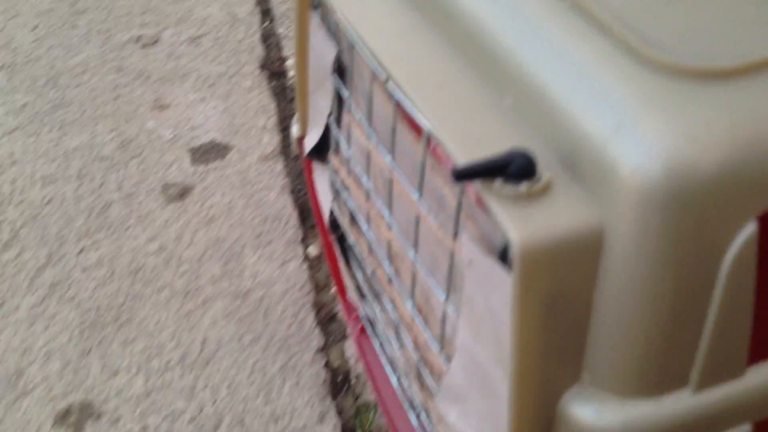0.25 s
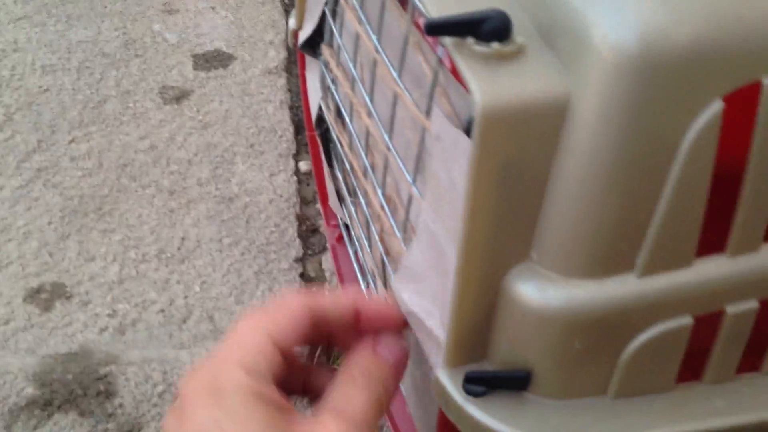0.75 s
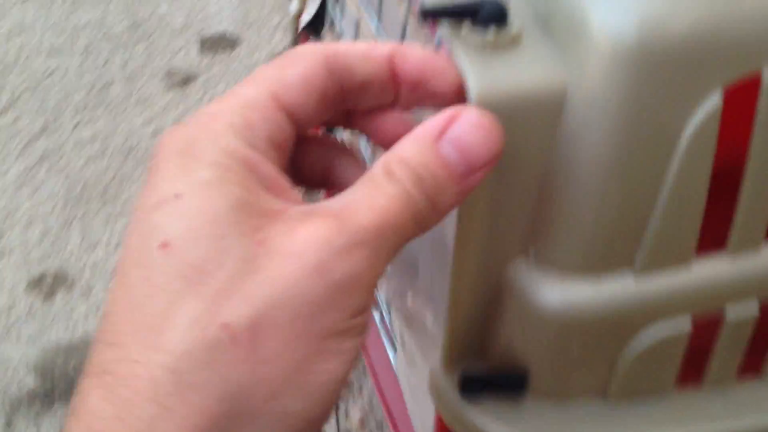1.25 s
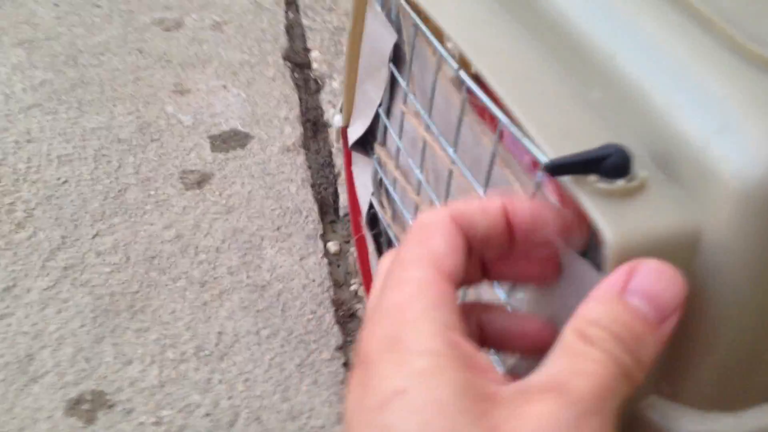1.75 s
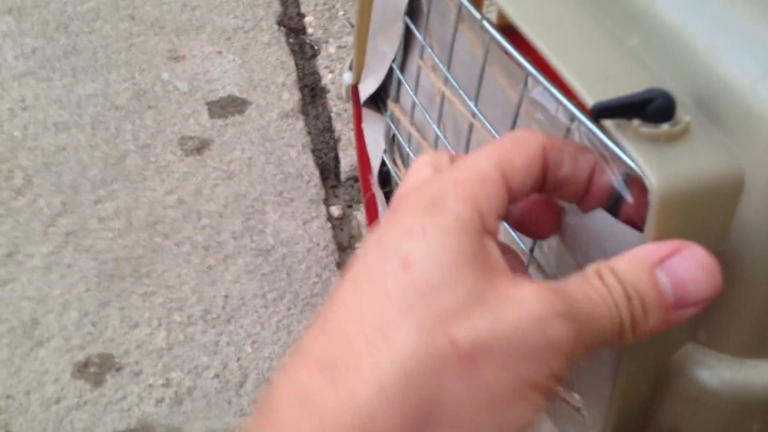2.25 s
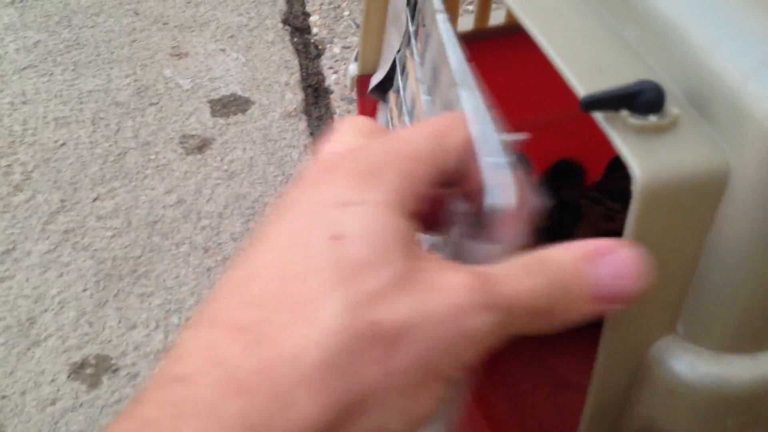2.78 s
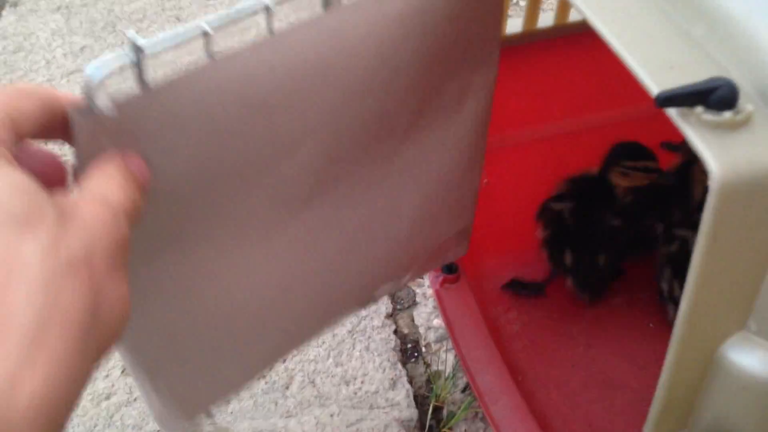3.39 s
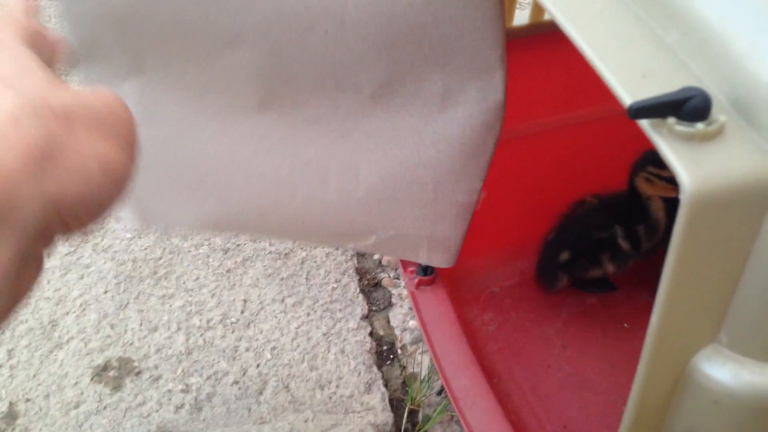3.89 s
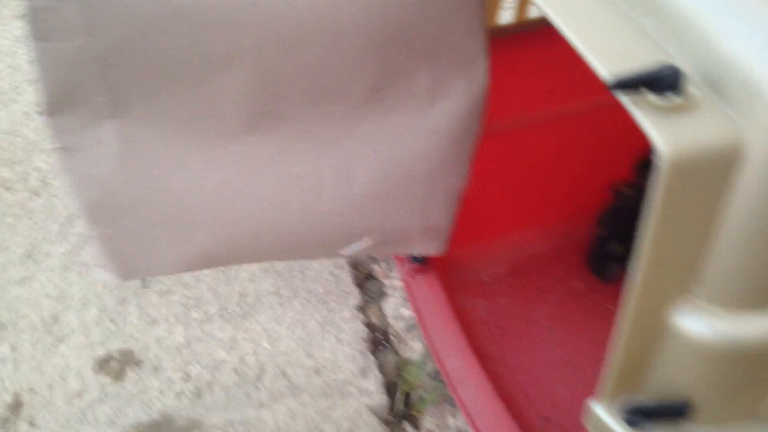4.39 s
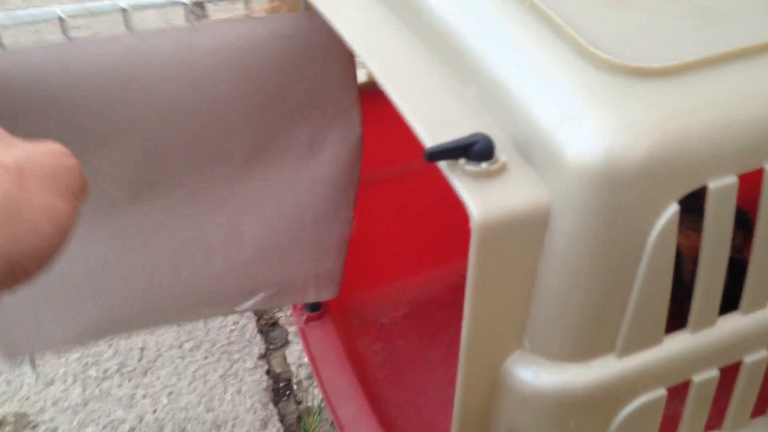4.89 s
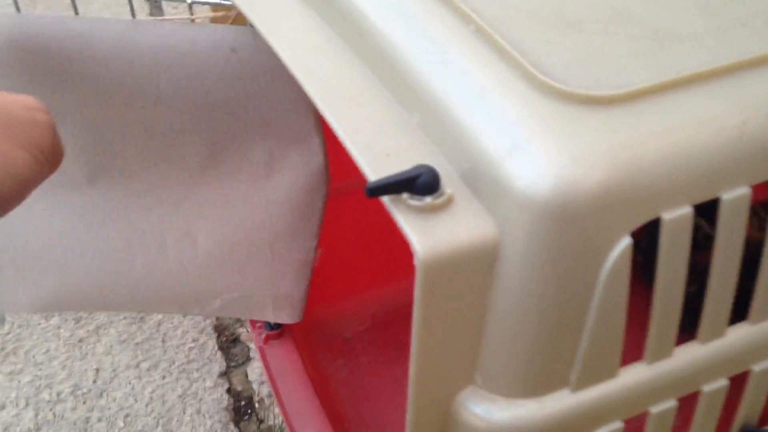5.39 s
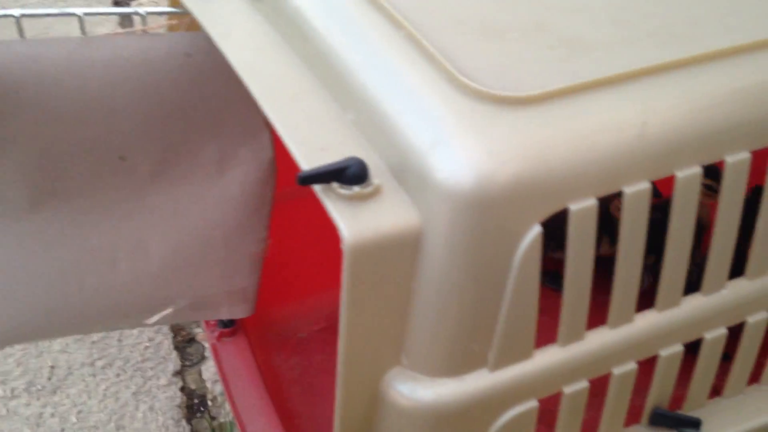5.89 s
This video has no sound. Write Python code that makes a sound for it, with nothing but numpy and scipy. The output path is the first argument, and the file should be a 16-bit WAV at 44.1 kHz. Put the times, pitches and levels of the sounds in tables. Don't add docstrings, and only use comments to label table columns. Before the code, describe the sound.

Close to the microphone on a pavement, a plastic animal carrier is handled. Two faint duckling peeps come first, then a hollow knock, latch clicks and rustling paper. The wire door scrapes, jolts with a hard bang and springs open with a sharp snap. Ducklings answer with high falling peeps, growing frequent toward the end, while a distant bird whistles and a town rumbles softly.

```python
import sys
import numpy as np
from scipy import signal
from scipy.fft import rfft, irfft
from scipy.io import wavfile
from scipy.ndimage import uniform_filter1d

SR = 44100
rng = np.random.default_rng(int(sys.argv[2]) if len(sys.argv) > 2 else 0)


def convert_level_to_amplitude(level_db):
    exponent = np.asarray(level_db, float) / 20
    return 10 ** exponent


def dump(signal):
    limited = np.clip(np.atleast_2d(signal).T, -1, 1)
    pcm = np.round(limited * 32767).astype(np.int16)
    wavfile.write(sys.argv[1], SR, pcm)


N = 270774


def evened(x):
    return x / np.sqrt(np.mean(x ** 2) + 1e-20)


def topped(x):
    return x / (abs(x).max() + 1e-12)


def add(mix, s, sound):
    part = mix[round(s * SR):][:len(sound)]
    part += sound[:len(part)]


def along(rows):
    s, db = np.transpose(rows)
    gain = convert_level_to_amplitude(np.interp(np.arange(N) / SR, s, db, -120, -120))
    return uniform_filter1d(gain, size=300)


def resonate(x, hz, width):
    r = np.exp(-np.pi * abs(width) / SR)
    return signal.lfilter([1 - r, 0, r - 1], [1, -2 * r * np.cos(2 * np.pi * hz / SR), r * r], x)


def body(x, modes):
    return sum((-1) ** k * convert_level_to_amplitude(db) * resonate(x, hz, w) for k, (hz, w, db) in enumerate(modes))


def coloured(x, points):
    hz = np.fft.rfftfreq(len(x), 1 / SR)
    f, db = np.transpose(points)
    return irfft(rfft(x) * convert_level_to_amplitude(np.interp(np.log(hz + 1), np.log(f + 1), db)), len(x))


def drift(count, size):
    smooth = uniform_filter1d(rng.standard_normal(count), size)
    return evened(uniform_filter1d(smooth, size))


def town():
    # frequency in Hz, level in dB per Hz.
    town_spectrum = [(15, -59), (25, -30), (60, -22), (171, 0), (303, -2), (377, -1), (494, -8),
                     (783, -14.5), (873, -13.5), (1210, -20.5), (2320, -23), (14300, -42), (16300, -34)]
    # time in seconds, level in dB.
    swelling = [
        (0.0, -40),
        (1.04, -40),
        (1.93, -42.5),
        (2.7, -42),
        (3.23, -43),
        (6.14, -44),
    ]
    town_db = -43.5
    frames, hz = N // 256 + 5, np.fft.rfftfreq(1024, 1 / SR)
    a, b, patches = rng.standard_normal((frames, 513, 3)).T
    patches = evened(uniform_filter1d(uniform_filter1d(patches, 10, 0), 14, 1))
    s, db = np.transpose(swelling)
    swell_db = np.interp(np.arange(frames) * 256 / SR, s, db - town_db)
    bass_share = 1 / (1 + (hz / 1500) ** 2)[:, None]
    spectra = (a + 1j * b) * convert_level_to_amplitude(1.3 * patches)
    flat = signal.istft(spectra, nperseg=1024, noverlap=768)[1]
    swollen = signal.istft(spectra * convert_level_to_amplitude(bass_share * swell_db), nperseg=1024, noverlap=768)[1]
    return convert_level_to_amplitude(town_db) * coloured(swollen, town_spectrum)[:N] / np.std(coloured(flat, town_spectrum))


def motor():
    # time in seconds, level in dB, share of full speed.
    run = [
        (5.54, -68, .995),
        (5.66, -55, 1.001),
        (5.86, -57, .997),
        (5.95, -60, .995),
        (6.02, -62, 1.02),
        (6.14, -65, 1.03),
    ]
    # frequency in Hz, share of fuzz, level in dB.
    motor_tones = [(891, .3, 3.5), (352.4, .45, 6.5)]
    s, level_db, speed = np.transpose(run)
    speed_now = np.interp(np.arange(N) / SR, s, speed) + .004 * drift(N, size=1500)
    turns = np.cumsum(speed_now) / SR
    hum = np.zeros(N)
    for hz, fuzz, db in motor_tones:
        hum += convert_level_to_amplitude(db) * (1.2 + fuzz * drift(N, size=2000)) * np.sin(2 * np.pi * hz * turns)
    return along(np.transpose([s, level_db])) * hum


def whistle(rows, voice_db, flutter_db, waver, breath_db):
    s, hz, db = np.transpose(rows)
    t = np.arange(s[0], s[-1], 1 / SR)
    hz = uniform_filter1d(np.interp(t, s, hz), size=220, mode="nearest")
    height = hz / hz.max()
    turn = 2 * np.pi * np.cumsum(hz * (1 + waver * drift(len(t), size=90))) / SR
    gain = np.interp(t, s, convert_level_to_amplitude(db))
    octave, half, side = convert_level_to_amplitude(np.asarray(voice_db))
    onset = np.exp(-(t - s[0]) / .02)
    beat = 2 * np.pi * np.cumsum(850 * height ** 4.5 + 90 * drift(len(t), size=200)) / SR
    patchy = convert_level_to_amplitude(4.5 * drift(len(t), size=220))
    octave = octave * patchy * height ** 2.2
    tone = np.sin(turn) + octave * np.sin(2 * turn)
    tone += half * (0.18 + onset) * patchy[::-1] * np.sin(3 * turn / 2)
    side_pair = np.sin(turn + beat) + .4 * np.sin(turn - beat)
    tone += side * convert_level_to_amplitude(3.5 * drift(len(t), size=200)) * .6 * side_pair
    rasp = convert_level_to_amplitude(breath_db) * (1 + 13.0 * onset) + 1.1 * side
    tone += rasp * drift(len(t), size=16) * np.sin(turn + .6 * beat)
    gain *= convert_level_to_amplitude((flutter_db + 3.0 * side) * drift(len(t), size=100))
    return s[0], np.sqrt(2) * gain * tone * signal.windows.tukey(len(t), .06)


def far_bird():
    # start in seconds, length in seconds, level in dB, first pitch in Hz, pitch of the dip in Hz.
    bird_calls = [(1.281, .102, -44, 1470, 1450), (1.524, .092, -44, 1830, 1510),
                  (1.888, .094, -45, 1530, 1460), (2.155, .092, -44, 1520, 1440),
                  (3.405, .07, -50, 1480, 1400), (3.645, .062, -47, 1580, 1410),
                  (3.908, .08, -49, 1556, 1440), (5.035, .09, -52, 1400, 1400),
                  (5.278, .082, -42, 1654, 1450), (5.548, .096, -46, 1600, 1435),
                  (5.874, .096, -47, 1500, 1550)]
    home_hz = 1420
    out = np.zeros(N)
    for s, length, db, first_hz, dip_hz in bird_calls:
        off_pitch_db = -.025 * abs(first_hz - dip_hz)
        path = [(s, first_hz, db - 5 + off_pitch_db),
                (s + .46 * length, dip_hz, db),
                (s + .62 * length, 1.2 * dip_hz, db - 14),
                (s + .84 * length, 1.04 * home_hz, db - 9),
                (s + length, home_hz, db - 11)]
        add(out, *whistle(path, (-40, -60, -60), flutter_db=2.5, waver=0.008, breath_db=-40))
    return out


def puff():
    # middle in seconds, level in dB, frequency in Hz, half length in seconds.
    booms = [
        (.313, -26, 230, .013),
        (2.5155, -19, 322, .011),
        (2.843, -25, 185, .022),
        (5.76, -21, 240, .0035),
    ]
    t = np.arange(N) / SR
    out = np.zeros(N)
    for s, db, hz, half in booms:
        out -= convert_level_to_amplitude(db) * np.cos(2 * np.pi * hz * (t - s)) * np.exp(-((t - s) / half) ** 2)
    return out


def knocks():
    # start in seconds, crack in dB, walls in dB, hollow in dB, rise time of the rattle in seconds.
    shell_blows = [(.295, -14.5, -22, -17, .0041), (.343, -36, -40, -47, .0019),
                   (2.916, -35, -45, -33, .0036), (3.213, -36, -38, -35, .0016),
                   (4.0163, -29, -30, -31, .0014), (4.0947, -27, -43, -21.5, .0039),
                   (4.1995, -31, -31, -32, .0014), (5.013, -28.5, -36.5, -36, .0028),
                   (5.257, -34, -34, -27.5, .0045), (5.285, -33.5, -35, -51, .0014),
                   (5.385, -38, -36, -40, .0034), (5.727, -31, -43, -31, .00094)]
    door_blows = [(.724, -38, -41, -43, .0037), (1.1255, -17, -24, -29, .0026),
                  (2.26, -27, -35, -50, .0042), (2.285, -36, -24.5, -42, .0023),
                  (2.4978, -8, -16, -15, .0036), (2.81, -10.5, -25, -21, .0068),
                  (2.947, -31, -40, -29.5, .0034), (3.492, -39.5, -34.5, -32, .0014),
                  (3.672, -29, -36, -66, .0026), (4.621, -32.5, -41, -34, .0028),
                  (4.923, -31, -42, -57, .0045)]
    # frequency in Hz, width in Hz, level in dB.
    shell_crack = [(1670, 300, -1), (2060, 300, 0), (2710, 400, -4), (3300, 400, -5), (3750, 500, -7),
                   (4850, 900, -13)]
    door_crack = [(1600, 500, 0), (2500, 800, -3), (3400, 800, -1), (4400, 1000, -2), (5600, 1300, -7)]
    wall_modes = [(770, 274, 0), (1174, 600, 0.5), (1400, 287, 3)]
    hollow_modes = [(185.6, 69, -0.5), (314, 143, -3), (520, 240, -6)]
    out, t = np.zeros(N), np.arange(7000) / SR
    blows = [(*row, -19, shell_crack) for row in shell_blows]
    blows += [(*row, -17, door_crack) for row in door_blows]
    for s, crack_db, walls_db, hollow_db, rise, tick_db, crack in blows:
        u = t / max(rise, .001)
        hits = rng.standard_normal(len(t)) * convert_level_to_amplitude(4.7 * np.minimum(rng.exponential(1, len(t)), 4))
        rattle = hits * (1.16 * u ** 2 * np.exp(-1.7 * u) + 0.087 * np.exp(-t / 0.019))
        shove = rng.standard_normal(len(t)) * u * np.exp(-u / 1.45)
        sway = rng.standard_normal(len(t)) * t * np.exp(-t / (rise + 0.006))
        sound = convert_level_to_amplitude(crack_db) * topped(body(rattle, crack))
        sound += convert_level_to_amplitude(walls_db) * topped(body(body(shove, wall_modes), wall_modes))
        sound += convert_level_to_amplitude(hollow_db) * topped(resonate(body(sway, hollow_modes), 200, 450))
        sound += convert_level_to_amplitude(crack_db + tick_db) * topped(resonate(resonate(rattle, 6400, 7400), 8400, 10000))
        add(out, s, sound)
    return out


def snaps():
    # time in seconds, level in dB, centre frequency in Hz.
    latch_snaps = [(0.8864, -22, 4260), (0.8931, -30, 7740), (0.9053, -21, 6300), (0.9106, -27, 2980),
                   (1.0283, -45, 4900), (1.084, -38, 4100), (1.1063, -48, 3600), (1.122, -32, 5300),
                   (1.3437, -38, 6540), (1.6364, -39, 4800), (1.6816, -48, 4100), (1.691, -36, 6600),
                   (1.722, -34.5, 3200), (1.8231, -33, 6100), (1.8958, -38, 5670), (1.9056, -33.5, 4520),
                   (1.9771, -37, 6400), (2.026, -26, 5330), (2.0594, -39, 6200)]
    pin_snaps = [
        (2.8209, -2.5, 2560),
        (1.1273, -13, 2700),
    ]
    door_snaps = [(2.2856, -13, 6200), (2.2942, -22, 7140), (2.3588, -29, 5740), (2.4678, -45, 5100),
                  (2.4807, -28, 5900), (2.5265, -25, 8800), (2.5933, -34, 3900), (2.6899, -47, 5040),
                  (2.818, -16, 5030), (2.8486, -30, 7000), (2.8516, -16, 5460), (2.9876, -39, 7700),
                  (3.0333, -33, 6900), (3.0574, -32, 7160), (3.078, -27, 5700), (3.1132, -32, 11000),
                  (3.2322, -35, 6900), (3.2593, -21, 6940), (3.296, -32, 6600), (3.368, -43, 6200),
                  (3.674, -34, 7000), (3.834, -46, 4500), (4.052, -40, 8800), (4.9253, -30, 3900),
                  (5.018, -36, 9000), (5.093, -53, 8000), (5.332, -45, 10800), (5.534, -30, 5600),
                  (5.8366, -45, 5500)]
    paper_ticks = [(.6983, -48, 4000), (.7283, -42, 5000), (.7896, -40, 5200), (.859, -40, 4100),
                   (1.0401, -43, 4200), (1.8463, -46, 4000), (2.0708, -36, 4000), (2.1337, -43, 4400),
                   (2.172, -36, 7000), (2.261, -30, 9000), (2.9087, -35, 6000), (2.9481, -30, 8000),
                   (2.993, -36, 4000), (3.0965, -35, 12000), (3.128, -40, 9000), (3.1906, -37, 6500),
                   (3.307, -38, 9000), (3.32, -40, 10000), (3.4964, -42, 5000), (4.1025, -29, 2500),
                   (5.613, -39, 2800), (2.839, -32, 4000), (3.168, -43, 9000), (3.246, -42, 9000),
                   (3.858, -44, 2200)]
    out, t = np.zeros(N), np.arange(2000) / SR
    for rows, decay in [(latch_snaps, .001), (pin_snaps, .00006), (door_snaps + paper_ticks, .0005)]:
        for s, db, hz in rows:
            burst = rng.standard_normal(len(t)) * (.8 * np.exp(-t / decay) + .06 * np.exp(-t / .01))
            burst[0] = 1
            add(out, s, convert_level_to_amplitude(db) * topped(resonate(resonate(burst, hz, 0.95 * hz), hz, 2.1 * hz)))
    return out


def rustle():
    # start in seconds, length in seconds, level in dB, extra fizz at the top in dB.
    rubs = [(0.775, 0.069, -46.5, -5), (0.833, 0.14, -44.5, -4.5), (1.018, 0.1, -56, -1),
            (1.672, 0.026, -44, -10), (1.878, 0.12, -51, -1.5), (1.956, 0.2, -56, -2),
            (2.051, 0.062, -39, -7.5), (2.09, 0.1, -53, -5), (2.152, 0.078, -48.5, 2.5),
            (2.254, 0.095, -41.5, -4), (2.34, 0.23, -63, 5), (2.454, 0.064, -43.5, -9),
            (2.709, 0.026, -56, 2), (2.812, 0.27, -46.5, -3), (2.95, 0.29, -54, 0.5), (3.125, 0.28, -54, 4),
            (3.355, .03, -64, 9), (3.368, 0.15, -56.5, -1), (3.478, 0.09, -55.5, 6.5),
            (3.625, 0.04, -61, 4), (3.877, 0.14, -51.5, -2.5), (4.216, 0.045, -53, -4),
            (4.46, 0.11, -53, -2), (4.919, 0.06, -49, -4), (5.15, 0.05, -54, 0)]
    # start in seconds, level in dB, decay in seconds.
    tears = [
        (0.888, -39, 0.008),
        (2.028, -44, .005),
        (2.479, -40, .002),
        (3.2575, -32, 0.0045),
    ]
    # frequency in Hz, level in dB per Hz.
    paper_spectrum = [(710, -43), (1200, -10), (1400, -5), (2530, -2), (3660, 2), (8440, -6), (14700, -9),
                      (15500, -23), (16000, -47)]
    strokes, fizz, t = np.zeros(N), np.zeros(N), np.arange(1500) / SR
    for s, length, db, fizz_db in rubs:
        shape = convert_level_to_amplitude(db) * signal.windows.tukey(round(length * SR), .8)
        add(strokes, s, shape)
        add(fizz, s, shape * convert_level_to_amplitude(fizz_db))
    for s, db, decay in tears:
        add(strokes, s, convert_level_to_amplitude(db) * np.exp(-t / decay))
        add(fizz, s, convert_level_to_amplitude(db + 1.5) * np.exp(-t / decay))
    grains = rng.standard_normal(N) * (rng.random(N) < 15000 / SR)
    grains *= convert_level_to_amplitude(3.2 * np.minimum(rng.exponential(1, N), 3.5))
    paper = evened(coloured(grains, paper_spectrum)) * convert_level_to_amplitude(1.5 * drift(N, size=220))
    low = signal.oaconvolve(paper, signal.firwin(31, 7500, fs=SR), "same")
    return strokes * low + fizz * (paper - low)


def scrape():
    # time in seconds, level in dB.
    scrape_level = [
        (2.26, -68),
        (2.286, -36),
        (2.49, -47),
    ]
    # frequency in Hz, width in Hz, level in dB.
    wire_modes = [(1580, 110, 7), (2420, 200, -4), (3200, 580, -5)]
    rub = rng.standard_normal(N) * convert_level_to_amplitude(1.7 * drift(N, size=200))
    return along(scrape_level) * evened(body(rub, wire_modes))


def arch(top_s, top_hz, level_db, climb, fall, pace=1):
    dt = np.linspace(-climb, fall, num=14)
    rising_sag = (pace * abs(dt) / .047) ** 2.1
    falling_sag = (pace * abs(dt) / .072) ** 1.7
    sag = np.where(dt < 0, rising_sag, falling_sag)
    place = np.where(dt < 0, dt / climb, dt / fall)
    return np.transpose([top_s + dt, top_hz * (1 - np.minimum(sag, .55)), level_db - 17 * abs(place) ** 3])


def slide(row, habit):
    s, length, db, top_hz, rest_hz = row
    glide, lead, early, drop_hz, start_db, held_db, end_db = habit
    swell_s, drop_s = .014, .011
    rest = min(lead + (top_hz - rest_hz) / glide, length - 2 * drop_s)
    loud = max(rest - early, swell_s + .001)
    drop = length - drop_s
    t = np.linspace(0, length, num=40)
    hz = np.interp(t, [0, lead, rest, drop, length],
                   [top_hz - 130, top_hz, rest_hz, rest_hz, rest_hz - drop_hz])
    hz += .36 * (rest_hz - 3120) * np.interp(t, [rest, drop], [0, 1]) ** 1.6
    level_db = np.interp(t, [0, loud - swell_s, loud, drop, length],
                         [start_db, start_db, 0, held_db, end_db])
    level_db += -9 * np.exp(-t / .006)
    return np.transpose([s + t, hz, db + level_db])


def arched_peeps():
    # time of the top in seconds, top pitch in Hz, level in dB, climb in seconds, fall in
    # seconds.
    arches = [(.049, 4130, -44, .034, .042), (.216, 4090, -43, .036, .042), (3.445, 3400, -51, .032, .042),
              (3.945, 4120, -39, .032, .027), (4.486, 4020, -41, .03, .04), (4.652, 4020, -41, .028, .038),
              (5.589, 4120, -39, .038, .042), (5.75, 4230, -41, .034, .04), (6.072, 4270, -47, .018, .032)]
    strands = [
        (4.18, 3200, -51, .03, .02),
        (5.695, 4330, -41, .017, .03),
        (5.968, 4380, -41, .021, .03),
    ]
    flicks = [(3.706, 3400, -54, .016, .003), (3.967, 3200, -49, .012, .013), (3.982, 3750, -50, .003, .03),
              (5.42, 4120, -41, .009, .022), (5.68, 4100, -42, .003, .012), (5.782, 3800, -46, .003, .018),
              (5.951, 4050, -41, .003, .012), (6.06, 3620, -46, .006, .018), (3.758, 4050, -42, .017, .024),
              (4.808, 3300, -52, .012, .004)]
    # octave in dB, half-line in dB, sidebands and rasp in dB.
    arch_voice = (-17, -30, -13)
    strand_voice = (-34, -24, -20)
    flick_voice = (-30, -14, -14)
    upper_voice = (-40, -40, -12)
    peeps = [(arch(*row), arch_voice) for row in arches]
    peeps += [(arch(*row), strand_voice) for row in strands]
    peeps += [(arch(*row, pace=1.6), flick_voice) for row in flicks]
    for s, hz, db, climb, fall in arches:
        peeps.append((arch(s - .002, 1.2 * hz, db - 7, climb, fall, pace=1.42), upper_voice))
    return peeps


def falling_peeps():
    # start in seconds, length in seconds, level in dB, top pitch in Hz, resting pitch in Hz.
    quick = [
        (2.298, .074, -29, 4200, 3570),
        (2.55, .07, -29, 4480, 3680),
        (2.856, .068, -35, 4340, 3590),
        (3.714, .082, -43, 3560, 2720),
        (3.983, .044, -41, 3980, 3150),
        (6.098, .041, -45, 3440, 3030),
    ]
    drawls = [
        (4.232, .104, -36.5, 3850, 3270),
        (5.439, .096, -33, 3700, 3310),
        (5.798, .058, -44, 3140, 3020),
    ]
    hooks = [
        (4.524, .094, -38.5, 3530, 3130),
        (4.814, .094, -35, 3650, 2990),
    ]
    flats = [
        (4.835, .05, -50, 2950, 2800),
        (5.162, .093, -33.5, 3730, 3200),
        (5.46, .068, -46, 3050, 2820),
    ]
    swoops = [
        (5.682, .104, -32, 3620, 3050),
        (5.96, .104, -32, 3540, 3130),
    ]
    tails = [
        (4.022, .055, -43, 3180, 2720),
    ]
    # octave in dB, half-line in dB, sidebands and rasp in dB.
    quick_habit = (19000, .001, .006, -20, -6, -7, -20)
    quick_voice = (-26, -26, -19)
    drawl_habit = (11500, .001, .006, 780, -8, -5, -8)
    drawl_voice = (-22, -15, -30)
    hook_habit = (14000, .018, .032, 480, -5, -5, -12)
    hook_voice = (-28, -22, -28)
    flat_habit = (12500, .001, .012, 110, -9, -5, -13)
    flat_voice = (-26, -20, -34)
    swoop_habit = (12500, .018, .04, -220, -6, -11, -16)
    swoop_voice = (-21, -14, -23)
    tail_habit = (11000, .001, .02, 20, -2, -2, -8)
    tail_voice = (-28, -30, -30)
    kinds = [(quick, quick_habit, quick_voice), (drawls, drawl_habit, drawl_voice),
             (hooks, hook_habit, hook_voice), (flats, flat_habit, flat_voice),
             (swoops, swoop_habit, swoop_voice), (tails, tail_habit, tail_voice)]
    return [(slide(row, habit), voice) for rows, habit, voice in kinds for row in rows]


def effort():
    # middle in seconds, change in
    # dB, half length in seconds.
    beads = [(.033, 6, .004), (.043, -3, .004), (.063, 2, .004), (.072, 6, .004), (.198, 3, .004),
             (.217, -5, .003), (.227, -5, .002), (.234, 8, .006), (3.756, 3, .005), (3.988, -5, .005),
             (4.035, -4, .006), (4.283, -5, .002), (4.3, -6, .003), (4.317, -5, .002), (4.327, 5, .003),
             (2.316, 3, .006), (2.575, 3, .005), (2.586, -4, .004), (2.6, 3, .01), (2.88, 3, .008),
             (3.93, 3, .004), (4.002, 4, .006), (4.012, -11, .004), (4.025, 4, .005), (4.051, -10, .003),
             (4.065, 3, .008), (4.246, 5, .005), (4.262, -3, .006), (4.276, 4, .004), (4.31, 3, .006),
             (4.47, 3, .004), (4.551, 4, .003), (4.557, -4, .002), (4.824, 4, .005), (5.173, 6, .004),
             (5.182, -3, .003), (5.197, 2, .005), (5.225, 3, .016), (5.487, 3, .016), (5.51, -3, .008),
             (6.02, -5, .012), (4.836, 2, .004), (4.844, -4, .003), (4.87, -5, .003), (4.655, 2, .008),
             (5.205, -3, .003), (5.428, 5, .003), (5.446, 3, .003), (5.6, 3, .008), (5.77, 3, .01),
             (5.96, 3, .003), (5.978, 3, .004), (5.99, -7, .002), (5.996, 3, .003), (6.001, -7, .0015),
             (6.045, 4, .008), (6.095, 5, .004)]
    sways = [(0.023, 6.5, 0.002), (0.03, -5.5, 0.003), (0.075, -4.5, 0.004), (0.2, -2.5, 0.009),
             (0.221, 6.0, 0.004), (2.31, 8.0, 0.006), (2.323, 3.0, 0.002), (2.566, -4.0, 0.004),
             (2.584, -2.5, 0.003), (2.586, -7.5, 0.009), (2.607, 3.0, 0.002), (2.615, -5.5, 0.004),
             (2.862, 4.5, 0.003), (2.873, 9.0, 0.006), (2.89, -4.0, 0.002), (2.903, -9.0, 0.009),
             (3.446, -4.0, 0.009), (3.767, -4.5, 0.006), (3.924, -6.0, 0.006), (3.937, -3.5, 0.002),
             (3.952, 4.5, 0.004), (3.998, -3.5, 0.009), (4.028, 4.0, 0.003), (4.048, -3.5, 0.009),
             (4.254, 4.5, 0.009), (4.268, -4.0, 0.003), (4.298, 3.5, 0.009), (4.332, -3.5, 0.009),
             (4.467, -6.0, 0.004), (4.51, -5.5, 0.006), (4.54, -9.0, 0.006), (4.605, 3.0, 0.009),
             (4.634, -3.5, 0.003), (4.654, 4.5, 0.004), (4.677, -4.0, 0.009), (4.831, 5.0, 0.009),
             (4.871, 2.5, 0.014), (4.892, -2.0, 0.004), (5.202, 3.5, 0.004), (5.217, -1.5, 0.009),
             (5.244, -3.5, 0.004), (5.441, 3.0, 0.006), (5.459, -3.5, 0.004), (5.492, 3.0, 0.02),
             (5.567, -6.5, 0.006), (5.585, 4.0, 0.003), (5.62, 3.5, 0.006), (5.682, 2.5, 0.006),
             (5.698, 4.5, 0.006), (5.716, -3.0, 0.002), (5.75, -3.0, 0.009), (5.779, 3.5, 0.003),
             (5.97, -2.0, 0.009), (6.001, 3.5, 0.004), (6.062, -4.5, 0.009), (6.096, 7.5, 0.006)]
    db = np.zeros(N)
    for s, push_db, half in beads + sways:
        t = np.arange(-3 * half, 3 * half, 1 / SR)
        add(db, s + t[0], push_db * np.exp(-(t / half) ** 2))
    return convert_level_to_amplitude(db)


def ducklings():
    # frequency in Hz, width in Hz, level in dB.
    box_modes = [(3310, 150, -1), (3560, 150, -3), (2950, 200, -5)]
    out = np.zeros(N)
    for path, voice_db in arched_peeps() + falling_peeps():
        add(out, *whistle(path, voice_db, flutter_db=.4, waver=.0045, breath_db=-32))
    out = out * effort()
    ringing = sum(convert_level_to_amplitude(db) * resonate(out, hz, w) for hz, w, db in box_modes)
    out = convert_level_to_amplitude(-3) * (out + ringing)
    t = np.arange(3000) / SR
    bounces = rng.standard_normal(len(t)) * (rng.random(len(t)) < .05)
    echoes = bounces * convert_level_to_amplitude(-60 * t / 0.039) * (t > .0012)
    return out + convert_level_to_amplitude(-11) * signal.oaconvolve(out, echoes / np.linalg.norm(echoes))[:N]


def scene():
    handling = puff() + knocks() + snaps() + rustle() + scrape()
    return (town() + motor() + far_bird() + handling + ducklings())[None]


def low_pass(x):
    return signal.sosfilt(signal.butter(12, 16480, fs=SR, output="sos"), x)


def record(dry):
    low = signal.oaconvolve(dry, signal.firwin(255, 15350, fs=SR)[None], "same")
    mix = low + convert_level_to_amplitude(-28) * (dry - low)
    return low_pass(mix)


dry = scene()
out = record(dry)
dump(out)
```